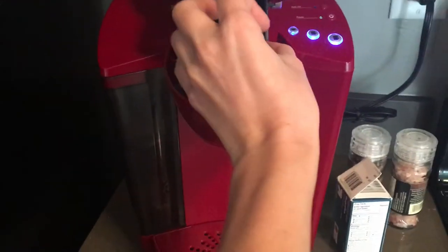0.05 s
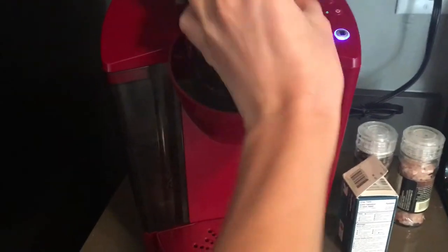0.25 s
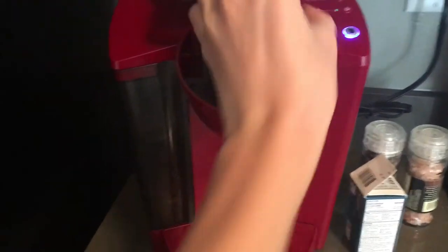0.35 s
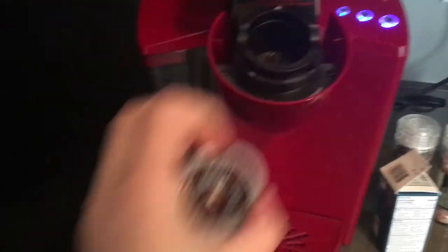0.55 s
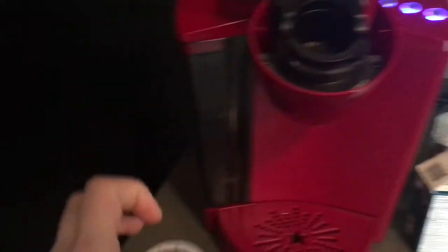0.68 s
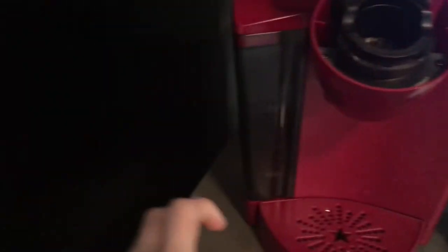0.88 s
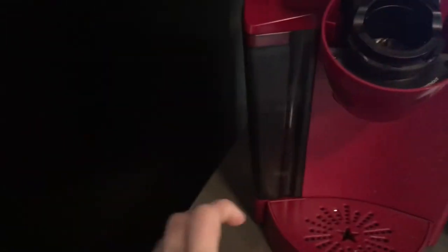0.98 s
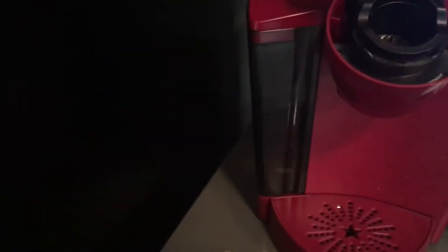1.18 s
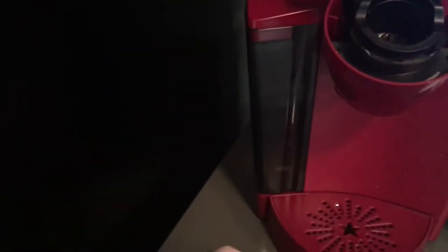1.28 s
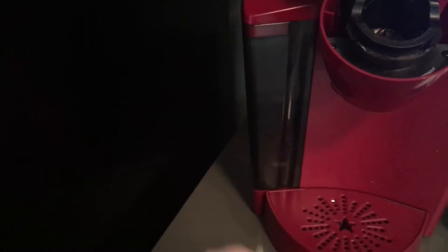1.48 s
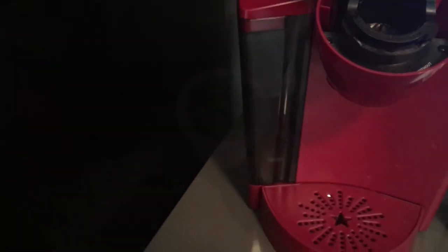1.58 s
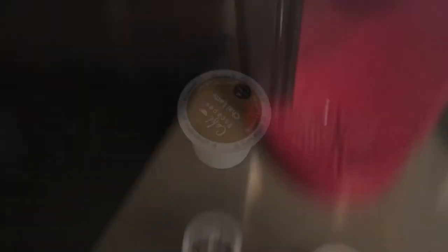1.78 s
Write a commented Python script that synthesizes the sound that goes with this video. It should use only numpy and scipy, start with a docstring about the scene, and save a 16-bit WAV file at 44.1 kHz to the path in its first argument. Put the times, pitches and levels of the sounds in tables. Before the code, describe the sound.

A plastic coffee pod is worked out of a coffee machine with clicks, a sharp crack, a hollow pop and a faint scrape. It then clacks onto the counter, close to the microphone, in a small humming kitchen.

```python
"""Coffee pod out of its holder

A small kitchen, one microphone close to the coffee machine. A hand works a pod loose: the plastic holder
clicks, the lid cracks, and the pod comes free with a hollow pop, scraping and bumping the housing on its
way out. A second later it is set down on the counter. The room rings briefly; behind it all are a low
mains hum and the rush of an appliance."""
import sys
import numpy as np
from scipy import signal
from scipy.fft import rfft, irfft, next_fast_len
from scipy.io import wavfile
from scipy.ndimage import map_coordinates

SR = 44100
rng = np.random.default_rng(int(sys.argv[2]) if len(sys.argv) > 2 else 0)


def unload_audio(sound):
    """Save the sound as a 16-bit wav file, at the path given as the first command line argument."""
    columns = np.transpose(np.atleast_2d(sound))
    # keep every value between -1 and 1, then stretch to whole-number steps
    steps = np.round(np.clip(columns, -1, 1) * 32767)
    wavfile.write(sys.argv[1], SR, steps.astype(np.int16))


N = 81585

# modes of the machine's housing: pitch_hz, level_db, t60_s
HOUSING_MODES = [(137, -7.5, 0.36), (165, -5, 0.098), (236, 4, 0.093), (308.4, 1.5, 0.14),
                 (460, -1.5, 0.04)]


def pop():
    """As the pod comes free, the hollow cup and the holder's cavity swell and ring."""
    # cavity modes: pitch_hz, level_db, t60_s
    cavity_modes = [(460, -32, .03), (860, -23, .06), (1073, 8, .0141), (1248, 2.5, .03),
                    (1324, -.5, .0236), (1398, 8, .0063), (1470, -23, .06)]
    t = since(0.2156)
    return ring(cavity_modes, t) * swell(t, rise_s=0.0033)


def lid_crack():
    """The pod's lid cracks sharply as it lets go, just ahead of the pop."""
    # cracks: start_s, burst_db, ring_db, thump_db, rise_s, t60_s, burst_db_per_oct, ring_db_per_oct
    cracks = [(0.2132, -28.5, -42, -74, 0.00033, 0.045, 2, 0),
              (0.2153, -19.5, -31.5, -34, 0.0002, 0.027, 0, 0)]
    # spectrum of a crack: frequency_hz, level_db
    crack_colour = [(300, 6.5), (700, 0.5), (1700, 3.5), (2500, 3), (3100, -16), (4000, 0), (6500, -4),
                    (8500, -8), (11000, -12.5), (15500, -22)]
    # lid modes: pitch_hz, level_db, t60_s
    lid_modes = [(3890, 1, .028), (4215, -4, .02), (4790, -1, .026), (5400, -2, .026), (6250, -5, .022),
                 (7950, -6, .02)]
    return impacts(cracks, crack_colour, lid_modes, HOUSING_MODES, thump_rise_s=0.0033)


def holder_clicks():
    """Plastic snaps ring the holder's shell and bump the housing as the pod is worked out."""
    # contacts: start_s, burst_db, ring_db, thump_db, rise_s, t60_s, burst_db_per_oct, ring_db_per_oct
    contacts = [(0.0149, -46.5, -48.5, -44, .001, 0.047, 8, -0.5),
                (0.0482, -36, -76, -71, .0008, 0.043, 9, -5), (0.0618, -29, -51, -63, 0.0018, 0.055, 7, 8),
                (0.0660, -31.5, -28, -33, 0.00067, 0.094, -13, 1),
                (0.2945, -37.5, -27, -36.5, .003, 0.16, 0, -8),
                (0.3095, -25, -28.5, -30, 0.0019, 0.033, 3, 0), (0.4262, -40, -48, -45, .002, 0.05, 8, -2),
                (0.4330, -37.5, -31, -28, 0.00079, 0.071, -4, -10)]
    # spectrum of a plastic snap: frequency_hz, level_db
    snap_colour = [(300, -25), (1500, 5), (2400, 11), (3000, 1.5), (4000, 3), (5500, -3.5), (8000, -9),
                   (11000, -16.5), (15500, -27)]
    # shell modes: pitch_hz, level_db, t60_s
    shell_modes = [(880, -9, .05), (1090, -3, .06), (1238, 0, .06), (1680, -8, .08), (2223, -8, .06),
                   (2350, -8, .05), (2519, -9, .07), (3914, -6, .03), (4409, -13, .04)]
    return impacts(contacts, snap_colour, shell_modes, HOUSING_MODES, thump_rise_s=0.0028)


def pod_landing():
    """The cup clacks down, edge first, then flat, and the counter thumps under it."""
    # landings: start_s, burst_db, ring_db, thump_db, rise_s, t60_s, burst_db_per_oct, ring_db_per_oct
    landings = [(1.2202, -23.5, -24, -58, 0.00055, 0.036, 0, -12),
                (1.2271, -13.5, -26.5, -11, 0.00051, 0.018, 0, 4)]
    # spectrum of the clack: frequency_hz, level_db
    clack_colour = [(150, -19), (550, -26), (950, 4.5), (1400, 1), (2200, 1), (3300, 0), (4900, -6.5),
                    (6000, -4.5), (9500, -10), (15500, -23)]
    # modes of the cup, and of the counter for the lowest two (835, 1000 Hz): pitch_hz, level_db, t60_s
    cup_and_counter_modes = [(835, -1, .035), (1000, -2, .04), (1745, -7, .07), (2030, 3, .018), (2222, -1, .05),
                             (2450, 3, .016), (3150, 3, .011), (3330, -6, .022), (3800, -9, .035), (4016, -11, .04),
                             (4550, -6, .012), (5717, -16, .035)]
    # counter modes: pitch_hz, level_db, t60_s
    counter_modes = [(128, -5, .07), (144, 0, .09), (255, -3, .05), (290, -8, .06), (375, -9, .04),
                     (546, -16, .05)]
    return impacts(landings, clack_colour, cup_and_counter_modes, counter_modes, thump_rise_s=0.0054)


def pod_slide():
    """The pod rubs unevenly along the holder's rim and slips free with a faint, high squeak."""
    # course of the rubbing: time_s, level_db
    rub_levels = [(.23, -72), (.26, -58), (.34, -55), (.39, -60), (.455, -61), (.475, -56), (.492, -61),
                  (.52, -54), (.53, -70), (.58, -90)]
    # spectrum of rubbed plastic: frequency_hz, level_db
    rub_colour = [(400, -19), (1500, -8.5), (2600, 4), (5000, -14), (8000, -9), (11500, -19), (15500, -30)]
    squeak_s, width_s, squeak_hz, width_hz = 0.512, 0.009, 11600, 450
    t = since(0)
    rub_db = np.interp(t, *np.transpose(rub_levels)) + 1.5 * wobble(rate_hz=126.6)
    rub = amp(rub_db) * noise(rub_colour)
    squeak = filtered(rng.standard_normal(N), lambda hz: np.exp(-((hz - squeak_hz) / width_hz) ** 2))
    squeak_envelope = np.exp(-((t - squeak_s) / width_s) ** 2)
    return rub + amp(-64) * unit(squeak) * squeak_envelope


def appliance():
    """In the background an appliance hums, wavering slightly, over its steady rush of air."""
    # hum tones: pitch_hz, rms_db
    hum_tones = [(59.6, -45.5), (296, -55), (361, -57.5), (414.5, -53), (549, -61.5), (630, -64)]
    # spectrum of the rush: frequency_hz, relative_db
    rush_colour = [(20, -61), (35, -22), (55, 3.5), (80, 1.5), (105, -2.5), (135, -1), (190, -10),
                   (245, -2.5), (320, -4.5), (420, -9), (600, -17.5), (1260, -20), (2500, -29.5),
                   (5500, -41), (8000, -47.5), (11000, -55.5), (15500, -58)]
    t = since(0)
    hum = np.zeros(N)
    for hz, db in hum_tones:
        peak = np.sqrt(2) * amp(db + 0.8 * wobble(rate_hz=5.7))
        phase = 2 * np.pi * (hz * t + rng.random())
        drift_rad = 0.25 * wobble(rate_hz=4.55)
        hum += peak * np.sin(phase + drift_rad)
    return hum + amp(-40) * noise(rush_colour)


def kitchen(direct, tail_db):
    """The direct sound reaches the microphone, then reflections off counter and cupboards and a tail."""
    # decay of the room: frequency_hz, t60_s
    room_decay = [(150, 4.8), (500, -0.04), (1200, 1.59), (4000, 1.31), (9000, 1), (15000, 1)]
    # spectrum of its tail: frequency_hz, relative_db
    room_colour = [(150, 0), (600, 8.5), (1200, -2), (3000, 1), (8500, 1.5), (11500, -1.5), (15000, 1)]
    early_db, early_t60_s, delay_s = -16.5, 0.13, 0.008
    t = since(delay_s)
    hz, frame_s, bands = signal.stft(rng.standard_normal(N), SR, nperseg=256)
    bands = bands * fade(frame_s, along(room_decay, hz)[:, None])
    bands *= amp(along(room_colour, hz))[:, None]
    tail = signal.istft(bands, SR, nperseg=256)[1][:N] * (t > 0)
    early = rng.standard_normal(N) * fade(t, early_t60_s) * (t > 0)
    response = amp(tail_db) * tail / np.linalg.norm(tail) + amp(early_db) * early / np.linalg.norm(early)
    return direct + signal.fftconvolve(direct, response)[:N]


def impacts(contacts, colour, light_modes, heavy_modes, thump_rise_s):
    """Each contact is a burst of noise, the ring of a light part and the slower thump of a heavy one."""
    out = np.zeros(N)
    for start_s, burst_db, ring_db, thump_db, rise_s, t60_s, burst_tilt, ring_tilt in contacts:
        t = since(start_s)
        burst = amp(burst_db) * noise(colour, burst_tilt) * fade(t, t60_s)
        ringing = amp(ring_db) * ring(light_modes, t, ring_tilt, scatter_db=0.7)
        thump = amp(thump_db) * ring(heavy_modes, t, scatter_db=0.7)
        out += (burst + ringing) * swell(t, rise_s) + thump * swell(t, thump_rise_s)
    return out


def ring(modes, t, db_per_oct=0, scatter_db=0):
    """Damped modes of alternating sign, their levels tilted about 1 kHz and scattered at random."""
    out = np.zeros(N)
    for k, (hz, db, t60_s) in enumerate(modes):
        level_db = db + db_per_oct * np.log2(hz / 1000) + scatter_db * rng.standard_normal()
        out += (-1) ** k * amp(level_db) * fade(t, t60_s) * np.sin(2 * np.pi * hz * t)
    return out


def noise(colour, db_per_oct=0):
    """Coloured noise of rms 1, tilted above 1 kHz."""
    def response(hz):
        return amp(along(colour, hz) + db_per_oct * np.log2(np.maximum(hz, 1000)))
    return unit(filtered(rng.standard_normal(N), response))


def wobble(rate_hz):
    """A smooth random curve through rate_hz points a second."""
    return map_coordinates(rng.standard_normal(256), [np.arange(N) * rate_hz / SR], mode="wrap")


def filtered(x, response):
    """x shaped by a gain that depends on frequency."""
    size = next_fast_len(N + SR // 2)
    return irfft(rfft(x, size) * response(np.fft.rfftfreq(size, 1 / SR)), size)[:N]


def along(points, hz):
    """(frequency_hz, value) points read on a log axis."""
    point_hz, values = np.transpose(points)
    return np.interp(np.log(hz + 1), np.log(point_hz + 1), values)


def since(start_s):
    """Seconds since start_s, zero before it."""
    return np.maximum(np.arange(N) / SR - start_s, 0)


def swell(t, rise_s):
    """Exponential rise from 0 to 1."""
    return 1 - np.exp(-t / rise_s)


def fade(t, t60_s):
    """Decay by 60 dB every t60_s."""
    return np.exp(-np.log(1000) * t / t60_s)


def amp(db):
    """Decibels to gain."""
    return 10 ** (np.asarray(db) / 20)


def unit(x):
    """x at rms 1."""
    return x / np.sqrt(np.mean(x ** 2) + 1e-20)


def scene():
    """The pod close by in the kitchen, the appliance behind it, in mono."""
    handling = kitchen(holder_clicks() + pod_slide(), tail_db=-13.5)
    release = kitchen(lid_crack() + pop(), tail_db=-13.5)
    set_down = kitchen(pod_landing(), tail_db=-16.5)
    return (handling + release + set_down + appliance())[None]


def record(dry):
    """The recorder cuts off steeply above its band limit."""
    top_hz = 15900
    return np.array([filtered(x, lambda hz: 1 / np.sqrt(1 + (hz / top_hz) ** 160)) for x in dry])


dry = scene()
out = record(dry)
unload_audio(out)
```